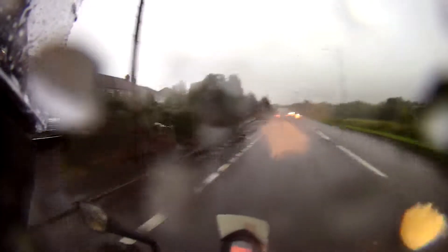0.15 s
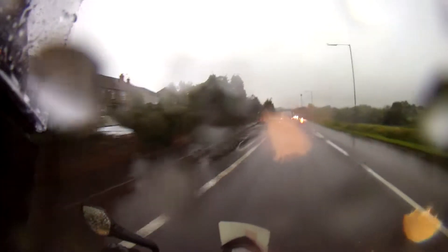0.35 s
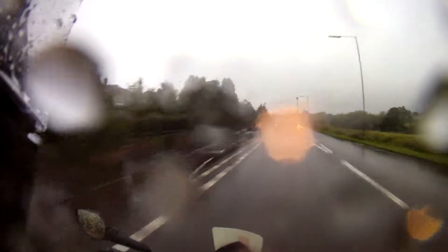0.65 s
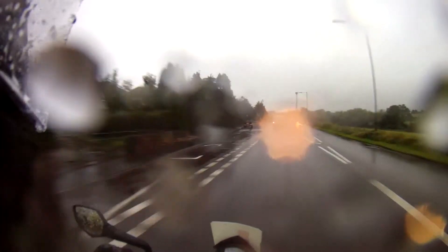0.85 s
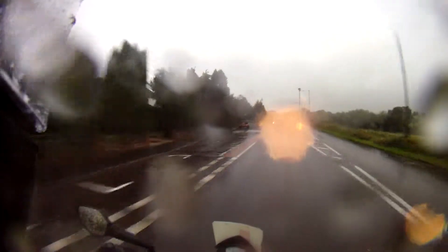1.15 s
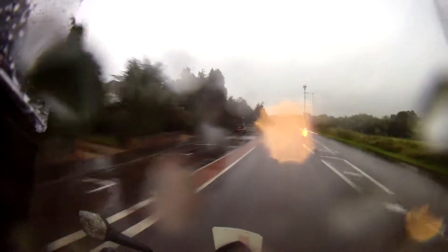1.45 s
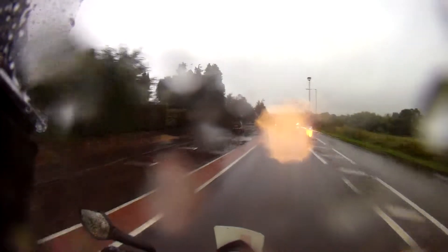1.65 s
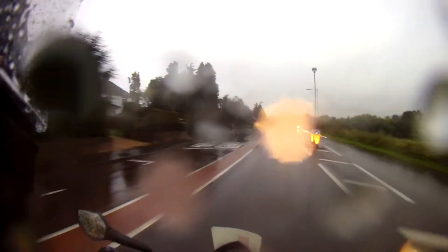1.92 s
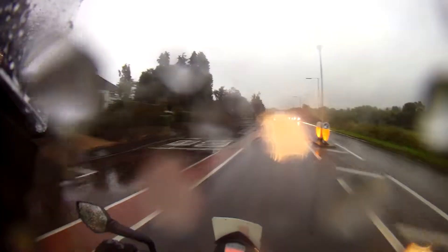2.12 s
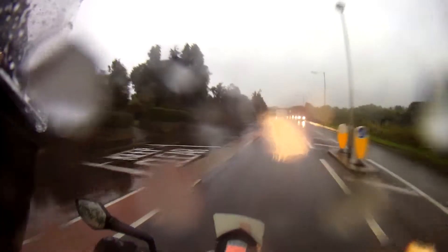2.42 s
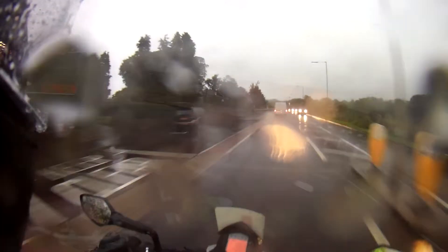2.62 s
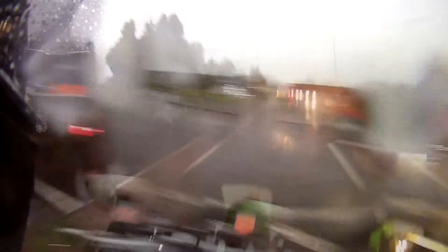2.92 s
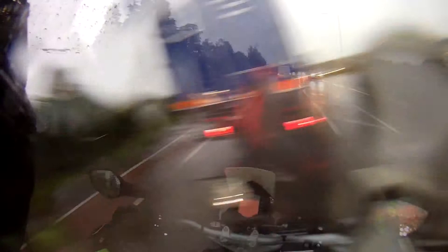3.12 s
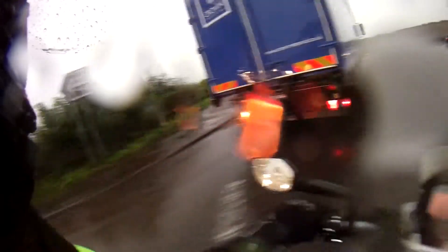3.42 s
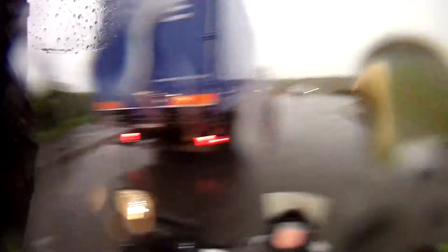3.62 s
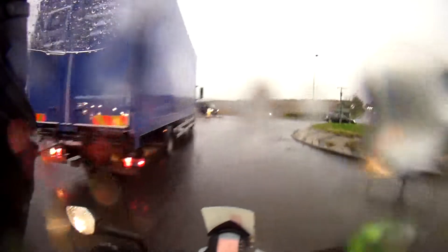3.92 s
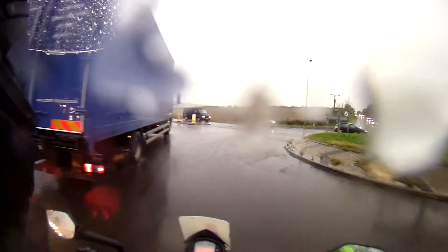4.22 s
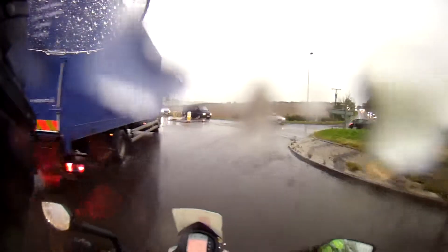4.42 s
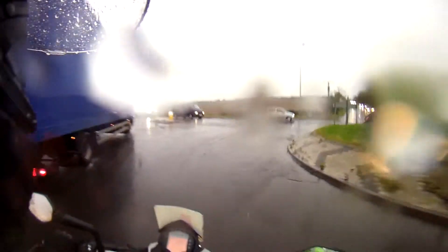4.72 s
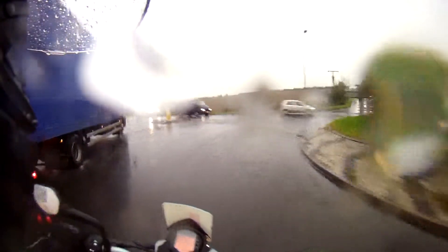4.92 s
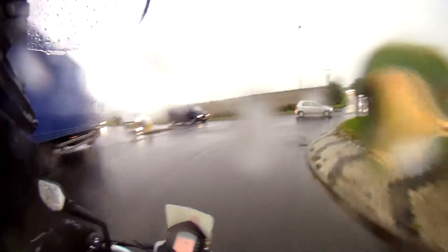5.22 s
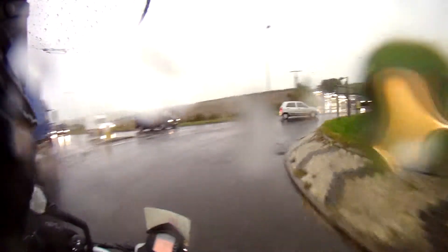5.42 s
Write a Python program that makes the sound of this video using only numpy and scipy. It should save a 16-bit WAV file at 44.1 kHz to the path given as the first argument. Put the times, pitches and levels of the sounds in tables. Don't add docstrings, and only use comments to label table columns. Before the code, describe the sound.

A single-cylinder motorcycle drones through buffeting wind on a wet road, slows and blips its throttle as a lorry's deep diesel hum swells alongside.

```python
import sys
import numpy as np
from scipy import signal
from scipy.fft import rfft, irfft, next_fast_len
from scipy.io import wavfile
from scipy.ndimage import uniform_filter1d, map_coordinates

SR = 44100
rng = np.random.default_rng(int(sys.argv[2]) if len(sys.argv) > 2 else 0)


def boost_factor(decibels):
    exponent = np.asarray(decibels, float) / 20
    return 10 ** exponent


def put_to_file(sound):
    columns = np.atleast_2d(sound).T
    safe = np.clip(columns, -1, 1)
    whole_steps = np.round(safe * 32767)
    wavfile.write(sys.argv[1], SR, whole_steps.astype(np.int16))


N = 245275

# time_s, firing_hz, level_db, throttle [0 cruise, 1 blip, 2 closing, 3 crawl]
ENGINE_RIDE = [(0, 41.7, -36, 0), (2.85, 41.6, -37, 0), (3.04, 41.5, -40, 0), (3.11, 42.3, -41.5, .6),
               (3.19, 43.8, -38.5, 1), (3.38, 46.6, -36.5, 1), (3.5, 47.3, -36, 1), (3.7, 47.7, -35.5, 1),
               (3.81, 47, -35.5, 1), (3.9, 46, -36, 1.1), (4.1, 42.6, -36.5, 1.3), (4.3, 39.5, -38, 2),
               (4.42, 37.4, -39.5, 2), (4.52, 36, -45, 3), (4.88, 35.8, -44, 3), (4.98, 35.8, -38, 3),
               (5.25, 36, -36, 3)]
# multiple of firing rate, cruise_db, blip_db,
# closing_db, crawl_db
EXHAUST_ORDERS = [(1, 0, -1, -1, -5), (2, -12, -10, -12, -16), (3, -14, -9.5, -12, -20),
                  (4, -3, -3, -11, -16), (5, -7, -6, -4.5, -7), (6, -8.5, -12, -7.5, -14),
                  (7, -11, -7.5, -15, -22), (8, -14, -14, -18, -26), (9, -19, -9.5, -15, -23),
                  (10, -23, -10.5, -20, -22), (11, -13, -9.5, -11, -18), (12, -34, -16.5, -16, -16),
                  (13, -32, -15, -18, -22), (13.5, -22, -40, -40, -40), (14, -30, -16, -16, -21),
                  (15, -25, -24, -17, -20), (16, -32, -30, -22, -24), (17, -36, -36, -30, -21),
                  (18, -36, -36, -36, -26)]
# pitch_hz, density_db [per Hz]
EXHAUST_ROAR = [(150, -38.5), (300, 0), (600, 0.5), (1000, -8.5), (2000, -24), (4000, -53)]
# time_s, strength_db
AIRFLOW = [
    (0, 1),
    (1.2, 1.5),
    (2.5, 2),
    (3.15, -10),
    (4.4, -5.5),
    (5.56, -2),
]
# time_s, thud_swell_db, flutter_swell_db
GUSTS = [(.07, 0, -1), (.24, 5, 3.5), (.49, -1, 4), (.62, 0, 4), (.75, 7, 2.5), (1.03, 1, 1.5),
         (1.3, 1.5, 3), (1.58, -5, 3.5), (1.71, 0, 5), (1.92, -2, 3.5), (2.07, 6, 1), (2.34, 3, 3.5),
         (2.579, 4, 3.5), (2.82, -2, 2), (3.03, 9, 4), (3.45, 7, 2.5), (3.8, 2, 0), (4.08, 7.5, 0),
         (4.3, 3, -1), (4.58, 5, 0), (4.73, 15, -2), (4.95, 11, 0), (5.14, 4, 0), (5.3, 9, -0.5)]
# pitch_hz, density_db [per Hz]
THUD_SPECTRUM = [(2.4, -37), (4.0, -3), (21, -2.5), (46, -12), (60, -8), (78, -27.5), (130, -120)]
# pitch_hz, density_db [per Hz]
FLUTTER_SPECTRUM = [(24, -29), (40, 1.5), (108, -2), (179, -6), (407, -15.5), (457, -18.5), (507, -24),
                    (556, -24), (900, -28), (1170, -47.5), (1980, -120)]
# time_s, peak_db, width_ms
SUCKING_EDDIES = [(0.058, -23.0, 7), (0.124, -26.0, 5), (0.193, -29.0, 10), (0.225, -21.5, 10),
                  (0.242, -29.5, 25), (0.246, -19.0, 5), (0.272, -27.0, 10), (0.385, -31.0, 25),
                  (0.419, -23.5, 10), (0.467, -25.0, 5), (0.481, -26.0, 25), (0.49, -21.5, 7),
                  (0.541, -24.5, 5), (0.631, -27.0, 7), (0.705, -21.0, 10), (0.726, -26.0, 7),
                  (0.82, -25.0, 19), (0.852, -25.0, 7), (0.927, -25.5, 10), (0.991, -24.0, 5),
                  (1.024, -21.0, 14), (1.092, -22.0, 7), (1.121, -30.0, 25), (1.242, -27.5, 25),
                  (1.28, -27.0, 10), (1.306, -26.0, 5), (1.33, -25.5, 10), (1.376, -24.5, 7),
                  (1.406, -28.0, 10), (1.574, -22.0, 2.5), (1.585, -27.0, 25), (1.711, -21.5, 7),
                  (1.791, -23.0, 19), (1.872, -25.0, 14), (1.933, -23.5, 3.5), (2.203, -25.0, 25),
                  (2.22, -29.0, 10), (2.266, -26.0, 7), (2.316, -25.5, 7), (2.337, -21.5, 7),
                  (2.57, -26.5, 25), (2.576, -25.0, 7), (2.772, -30.0, 25), (3.023, -33.0, 25),
                  (3.053, -31.0, 25)]
# time_s, peak_db, width_ms
MORE_SUCKING_EDDIES = [
    (.247, -21, 5),
    (.298, -24, 7),
]
# time_s, peak_db, width_ms
PRESSING_EDDIES = [(0.083, -25.5, 7), (0.09, -21.0, 25), (0.12, -27.0, 19), (0.163, -21.0, 7),
                   (0.182, -21.5, 25), (0.206, -21.5, 3.5), (0.244, -21.5, 2.5), (0.262, -19.5, 3.5),
                   (0.303, -24.0, 3.5), (0.31, -20.5, 10), (0.319, -31.5, 25), (0.386, -22.0, 5),
                   (0.512, -27.0, 5), (0.601, -29.5, 10), (0.627, -32.0, 25), (0.765, -20.5, 7),
                   (0.89, -26.5, 25), (0.972, -24.5, 14), (1.051, -33.0, 25), (1.051, -27.0, 5),
                   (1.17, -24.5, 7), (1.2, -24.5, 7), (1.25, -25.0, 3.5), (1.453, -29.5, 10),
                   (1.56, -25.0, 5), (1.664, -23.0, 5), (1.67, -32.0, 25), (1.7, -23.5, 3.5),
                   (1.818, -33.0, 25), (1.826, -30.0, 10), (1.853, -30.0, 25), (1.878, -26.5, 5),
                   (1.913, -21.5, 14), (1.978, -28.0, 19), (2.018, -28.0, 7), (2.078, -27.0, 25),
                   (2.099, -32.0, 25), (2.112, -23.5, 10), (2.446, -26.0, 7), (2.496, -27.0, 25),
                   (2.629, -31.5, 19), (3.023, -23.0, 10)]
# time_s, level_db
OWN_SPRAY = [
    (0, -54.5),
    (.9, -55.3),
    (2.3, -55.5),
    (2.8, -56.5),
    (3.05, -59),
    (3.5, -57.5),
    (5.2, -57),
    (5.56, -56),
]
# pitch_hz, density_db [per Hz]
OWN_TYRES = [(300, -38.5), (600, -9.5), (1000, -5.5), (1200, -12.5), (1450, -12.5), (1850, -19),
             (2700, -19.5), (3700, -23.5), (5000, -27.5), (7000, -31), (9500, -39), (11000, -47.5),
             (15500, -49.5), (16500, -59)]
# pitch_hz, density_db [per Hz]
VISOR_LEAK = [(5500, -40), (7500, -4), (9500, 2), (11000, -9), (14000, -14), (15500, -34)]
# start_s, peak_db, centre_hz, width_hz
RAIN_DROPS = [(1.4295, -35.5, 2300, 2500), (1.4296, -37, 1200, 1100), (1.4297, -58, 5500, 2000),
              (1.4297, -63, 8000, 1500), (1.949, -52.5, 6500, 3000), (2.0189, -43, 4700, 1800),
              (2.0195, -51, 3080, 800), (2.0196, -44, 1000, 900), (2.022, -50, 3200, 500),
              (2.0192, -57, 6000, 1500), (1.988, -60, 6500, 2500), (2.53, -44, 2170, 1200),
              (2.771, -54, 4560, 2020), (3.137, -36.5, 600, 300), (3.16, -44, 520, 250),
              (4.73, -34, 653.4, 500), (4.968, -41, 750, 500)]
# time_s, firing_hz, level_db
LORRY_PULL = [
    (2.9, 56, -55),
    (3.1, 57, -36),
    (3.5, 59.2, -31.5),
    (3.8, 62.8, -29.7),
    (4.2, 67.8, -27),
    (4.67, 77, -28.5),
    (5.1, 84.6, -30.5),
    (5.3, 88.2, -32.5),
    (5.56, 93.8, -35),
]
# multiple of firing rate, level_db
DIESEL_ORDERS = [(2, -14), (3, -22), (7, -24)]
# pitch_hz, density_db [per Hz]
LORRY_TYRES = [(200, -14), (400, -2.5), (650, 1), (800, -4), (1000, -3.5), (1450, -10.5), (1850, -19.5),
               (2300, -15.5), (2900, -19.5), (3700, -33.5), (5000, -44), (7000, -46.5), (11000, -52.5),
               (16000, -59.5)]
# start_s,
# peak_db, centre_hz, width_hz
PANEL_HUMS = [(4.46, -40, 140, 9), (4.58, -42, 165, 9), (4.71, -40, 146, 7), (4.96, -46, 560, 12),
              (5.12, -50, 547, 11), (5.24, -46.5, 611, 5), (3.17, -49, 620, 8), (3.9, -48, 635, 7),
              (4.72, -50, 530, 16), (4.85, -52, 650, 14), (4.79, -47, 585, 16), (4.9, -49, 505, 16),
              (5.06, -48, 600, 16), (5.16, -49, 640, 14), (5.3, -51, 432, 5), (4.42, -54, 1010, 8)]


def unit(x):
    return x / np.sqrt(np.mean(x ** 2) + 1e-20)


def curves(rows):
    s, *cols = np.transpose(rows)
    return [np.interp(np.arange(N) / SR, s, c) for c in cols]


def wobble(rate):
    coarse = np.arange(0, N + 32, 32)
    knots = rng.standard_normal(int(N * rate / SR) + 4)
    return np.interp(np.arange(N), coarse, map_coordinates(knots, [coarse * rate / SR]))


def step(at_s, width_s):
    return .5 + .5 * np.tanh((np.arange(N) / SR - at_s) / (2 * width_s))


def filtered(x, response):
    m = next_fast_len(N + SR // 2)
    return irfft(rfft(x, m) * response(np.fft.rfftfreq(m, 1 / SR)), m)[:N]


def resonance(centre_hz, width_hz):
    return lambda f: 1j * f * width_hz / (centre_hz ** 2 - f * f + 1j * f * width_hz)


def rush(spectrum, patchy_db, gate=1):
    z = signal.stft(gate * rng.standard_normal(N), nperseg=512)[2]
    field = uniform_filter1d(rng.standard_normal(z.shape), size=6, axis=0)
    field = uniform_filter1d(field, size=12, axis=1)
    x = signal.istft(z * boost_factor(patchy_db * unit(field)), nperseg=512)[1][:N]
    f, db = np.transpose(spectrum)
    return unit(filtered(x, lambda hz: boost_factor(np.interp(np.log(hz + 1), np.log(f + 1), db))))


def turns(rate_hz):
    return 2 * np.pi * np.cumsum(rate_hz) / SR


def rings(rows, length_s):
    x = np.zeros(N + SR)
    t = np.arange(int(length_s * SR)) / SR
    for s, db, hz, width_hz in rows:
        u = np.pi * width_hz * t
        x[round(s * SR):][:len(t)] += boost_factor(db + 10.0) * np.sin(2 * np.pi * hz * t) * u * np.exp(-u)
    return x[:N]


def motorcycle():
    rate_hz, level_db, throttle = curves(ENGINE_RIDE)
    load = np.clip(1 - abs(throttle - 1), 0, 1)
    angle = turns(rate_hz) + .015 * wobble(12)
    waver = np.interp(throttle, range(4), [.7, .2, .25, .4])
    spread, echo, echo_turn = .09, 1.2, 1.25
    x = np.zeros(N)
    for k, *dbs in EXHAUST_ORDERS:
        gain = boost_factor(np.interp(throttle, range(4), dbs) + 1.8 * waver * wobble(9))
        delay = echo * np.sin(echo_turn * k) - spread * k * k
        x -= gain * np.cos(k * angle + delay + .5 * waver * wobble(8))
    puff = rush(EXHAUST_ROAR, patchy_db=1.2, gate=np.exp(.3 * np.cos(angle)))
    return boost_factor(level_db) * (x + boost_factor(-14.5 - .3 * load) * puff)


def wind():
    air_db, = curves(AIRFLOW)
    s, *swells_db = np.transpose(GUSTS)
    t = np.arange(0, N / SR + .002, .002)
    gust_half_s = 0.063
    bells = np.exp(-((t - s[:, None]) / gust_half_s) ** 2)
    thud_db, flutter_db = curves(np.c_[t, (swells_db @ bells).T])
    lumps = wobble(15)
    thud = rush(THUD_SPECTRUM, patchy_db=-1.3)
    power = uniform_filter1d(uniform_filter1d(thud ** 2, size=3000), size=3000)
    thud = unit(boost_factor(0.37 * lumps) * thud / (.1 + abs(power)) ** .35)
    flutter_gain = boost_factor(0.13 * lumps + 0.76 * wobble(30))
    flutter = unit(flutter_gain * rush(FLUTTER_SPECTRUM, patchy_db=-0.37))
    return boost_factor(-40 + 0.3 * air_db + thud_db) * thud + boost_factor(-38 + 0.5 * air_db + flutter_db) * flutter


def eddies():
    x = np.zeros(N + SR)
    t = np.arange(-SR // 8, SR // 8) / SR
    for sign, rows in ((-1, [*SUCKING_EDDIES, *MORE_SUCKING_EDDIES]), (1, PRESSING_EDDIES)):
        for s, db, width_ms in rows:
            u = t / (0.75 * width_ms / 1000)
            x[round(s * SR):][:len(u)] += sign * boost_factor(db) * (1 - u * u) * np.exp(-u * u / 2)
    return x[SR // 8:][:N]


def own_tyres():
    level_db, = curves(OWN_SPRAY)
    droplets = boost_factor(1.5 * rng.exponential(size=N))
    level = boost_factor(level_db + .3 * wobble(5) + .5 * wobble(40))
    return level * rush(OWN_TYRES, patchy_db=1.2, gate=droplets)


def visor():
    narrow = resonance(7150, 330)
    whistle = unit(filtered(rng.standard_normal(N), lambda f: narrow(f) ** 2))
    sings = step(1.05, .03) - step(2.65, .15)
    leak_gate = step(1.065, .008) - step(1.13, .016)
    leak = leak_gate * rush(VISOR_LEAK, patchy_db=0.0)
    silent_db, singing_db = -92, -83.5
    whistle_db = silent_db + (singing_db - silent_db) * sings + 3.5 * wobble(25)
    return boost_factor(-76) * leak + boost_factor(whistle_db) * whistle


def drops():
    return rings(RAIN_DROPS, .01)


def lorry():
    rate_hz, level_db = curves(LORRY_PULL)
    angle = turns(rate_hz) + .04 * wobble(10)
    x = boost_factor(0.28 * wobble(9.2)) * np.cos(angle)
    body_hz, body_width_hz, body_db, upper_db = 650, 48, 23.5, -12
    for k, db in DIESEL_ORDERS:
        boom_db = body_db / (1 + ((k * rate_hz - body_hz) / body_width_hz) ** 4)
        x += boost_factor(db + upper_db + boom_db + 2 * wobble(8)) * np.cos(k * angle + .4 * wobble(11))
    return np.sqrt(2) * boost_factor(level_db) * x


def lorry_tyres():
    far_db, beside_db = -57.5, -45
    level_db = far_db + (beside_db - far_db) * step(3.42, .15)
    return boost_factor(level_db + 0.38 * wobble(3.8) + 0.71 * wobble(40)) * rush(LORRY_TYRES, patchy_db=0.5)


def panels():
    return rings(PANEL_HUMS, .6)


def scene():
    engines = motorcycle() + lorry()
    air = wind() + eddies()
    wet_road = own_tyres() + lorry_tyres()
    return (engines + air + wet_road + visor() + drops() + panels())[None]


def band_limit(x):
    return signal.sosfilt(signal.butter(12, 15720, fs=SR, output="sos"), x)


def record(dry):
    line = boost_factor(-103) * np.sin(2 * np.pi * 15278 * np.arange(N) / SR)
    close = np.clip(np.arange(N)[::-1] / 100, .1, 1)
    dry = dry / (1 + abs(dry / .3) ** 4) ** .25
    return band_limit((dry + line) * close)


dry = scene()
out = record(dry)
put_to_file(out)
```